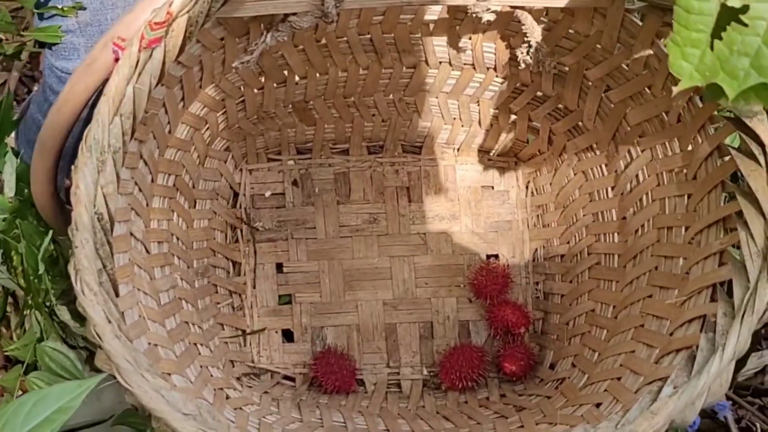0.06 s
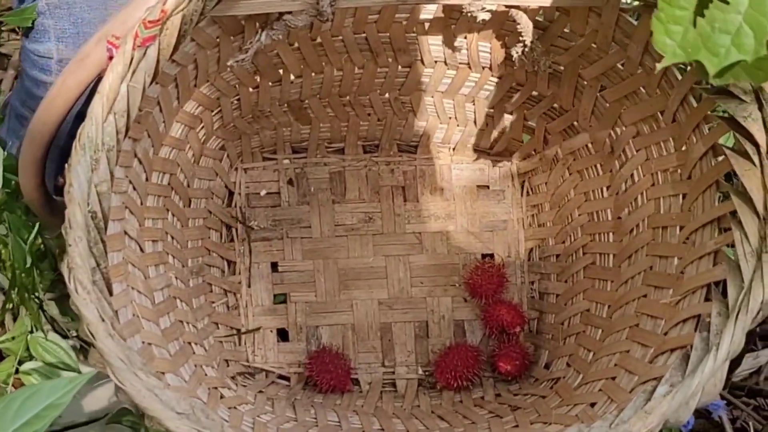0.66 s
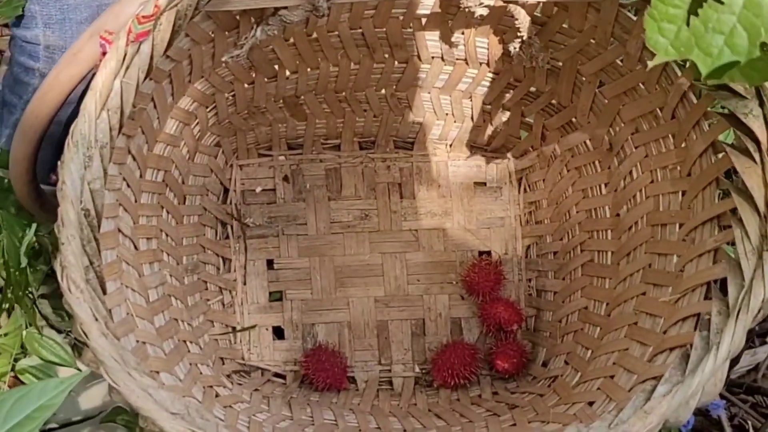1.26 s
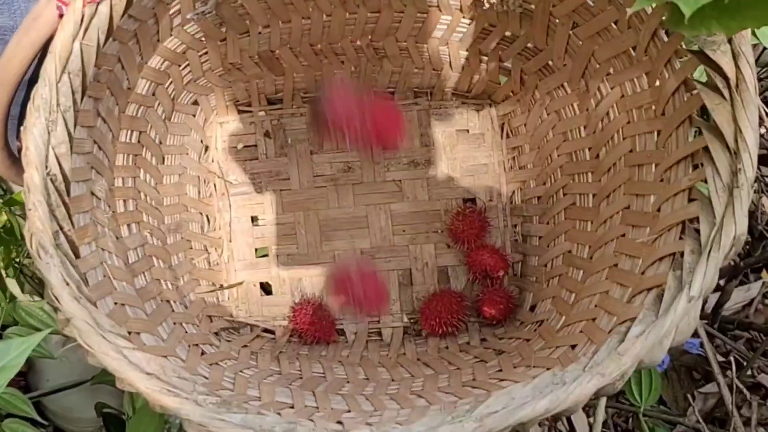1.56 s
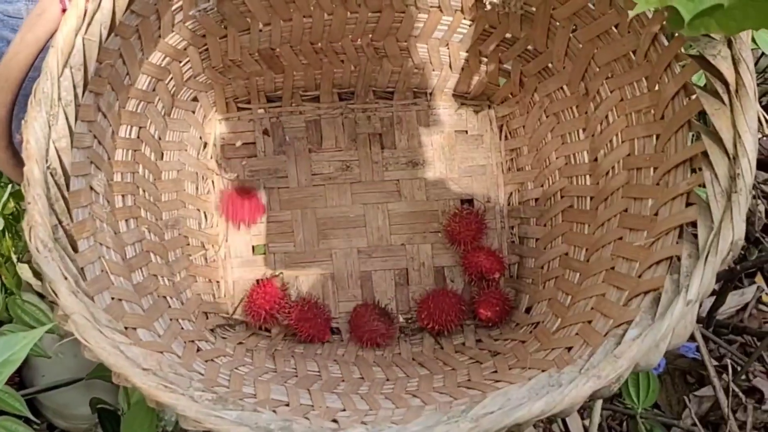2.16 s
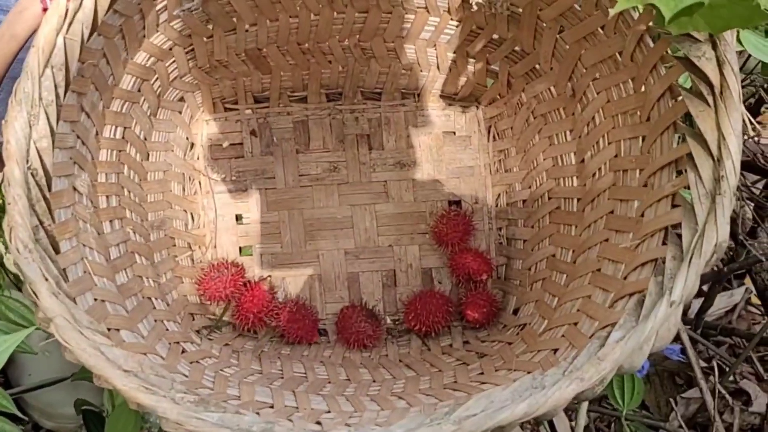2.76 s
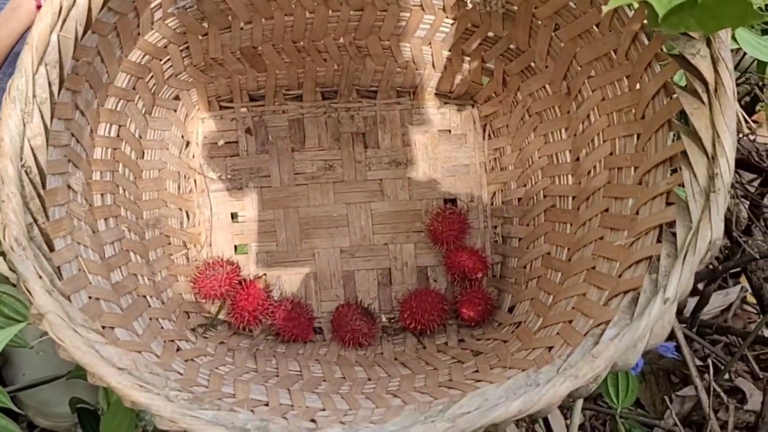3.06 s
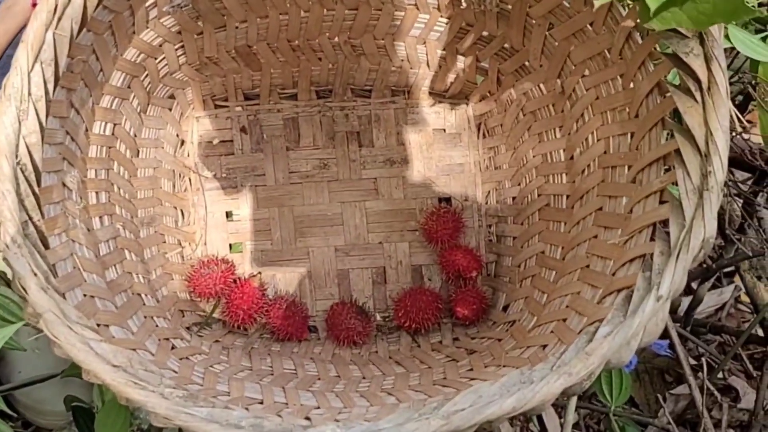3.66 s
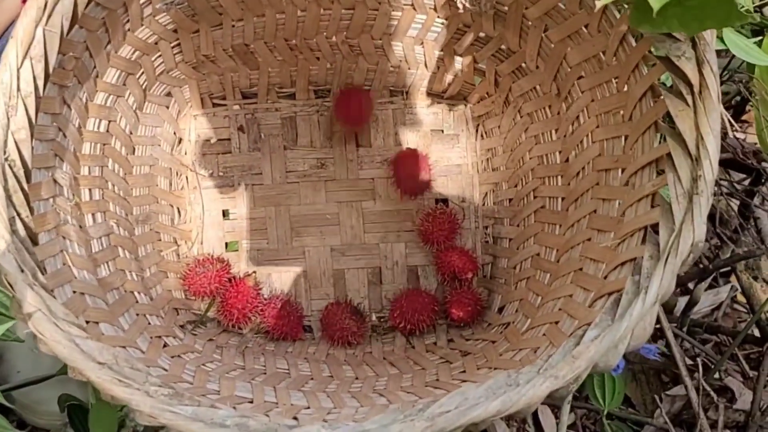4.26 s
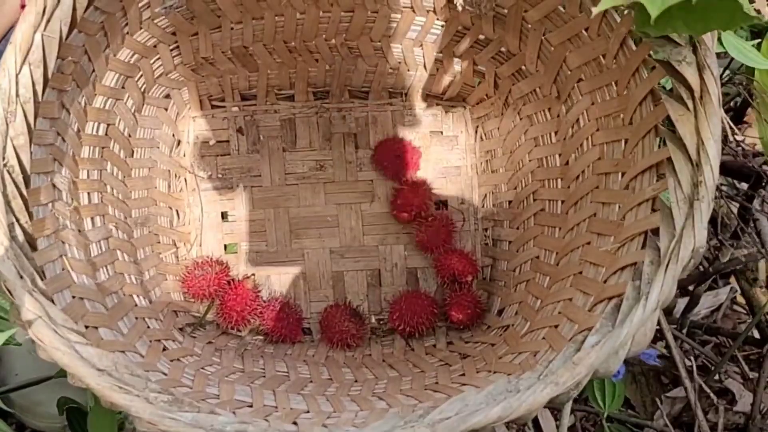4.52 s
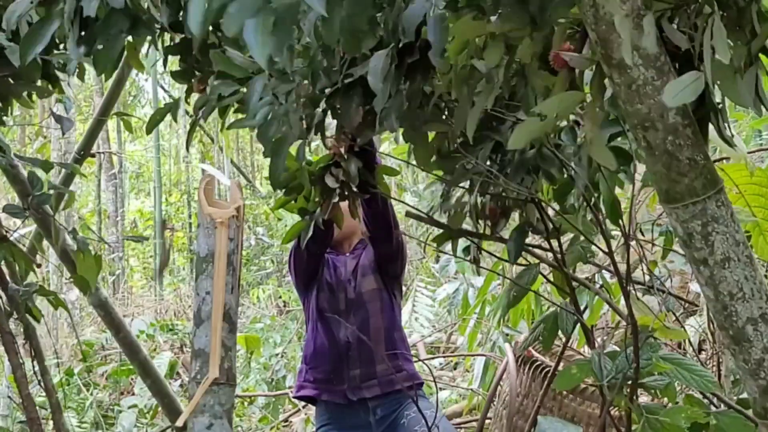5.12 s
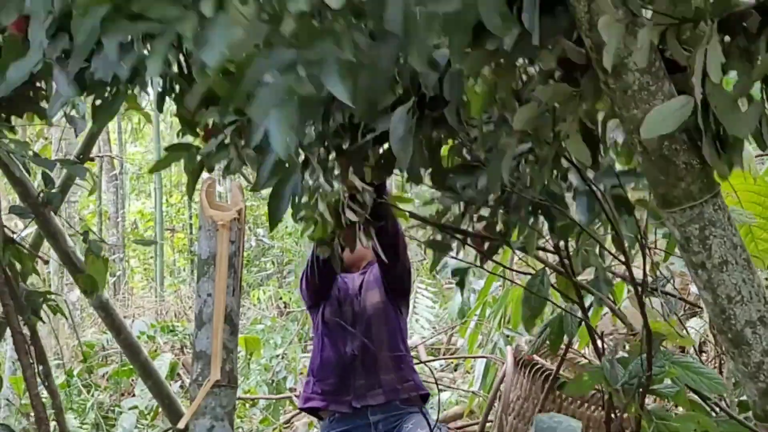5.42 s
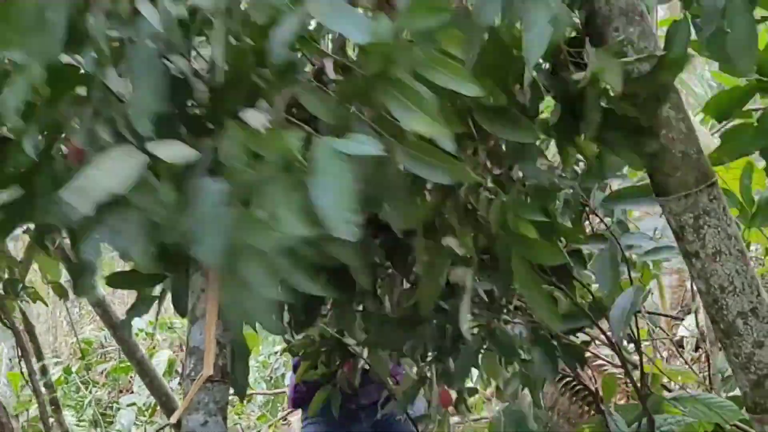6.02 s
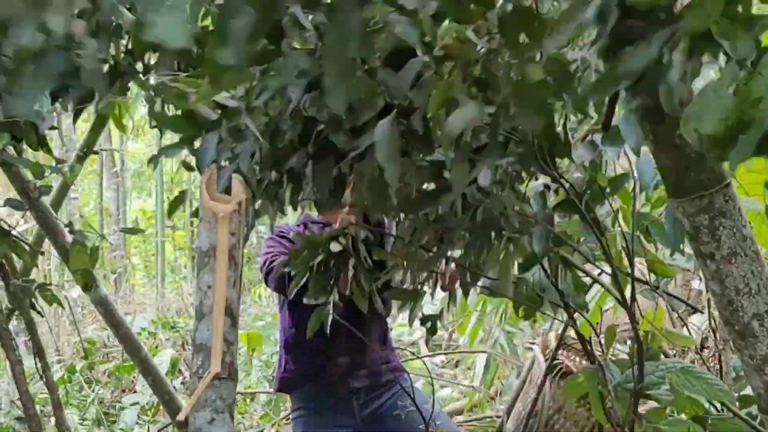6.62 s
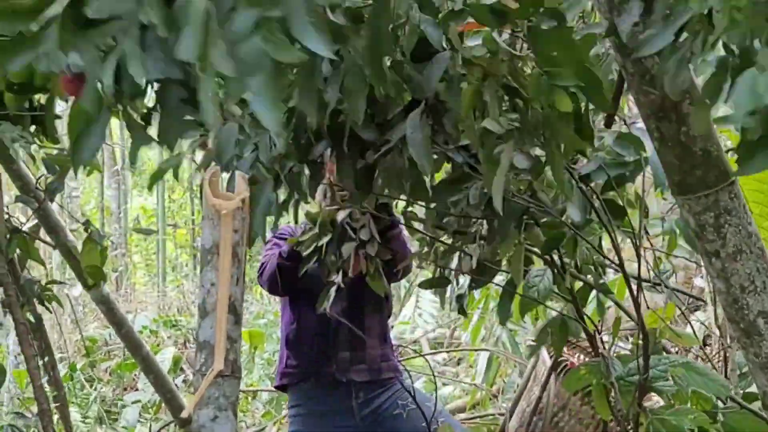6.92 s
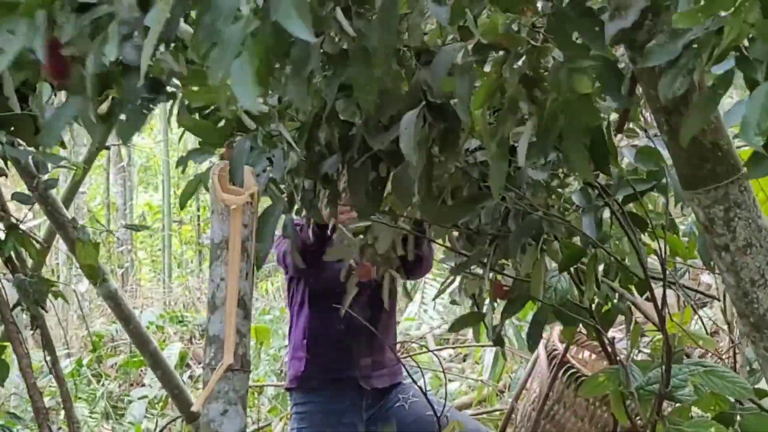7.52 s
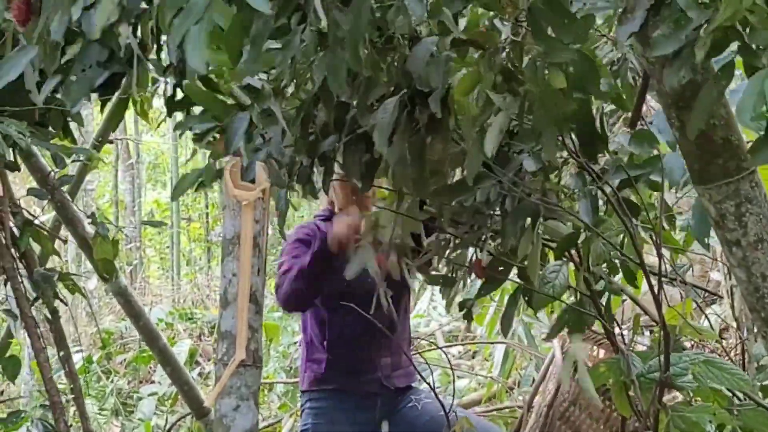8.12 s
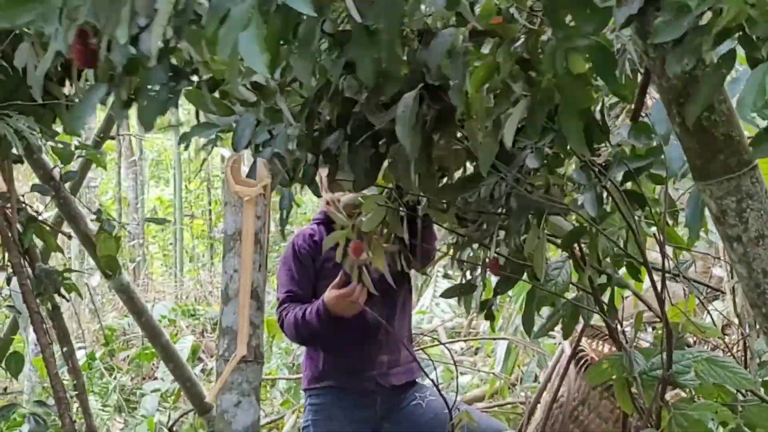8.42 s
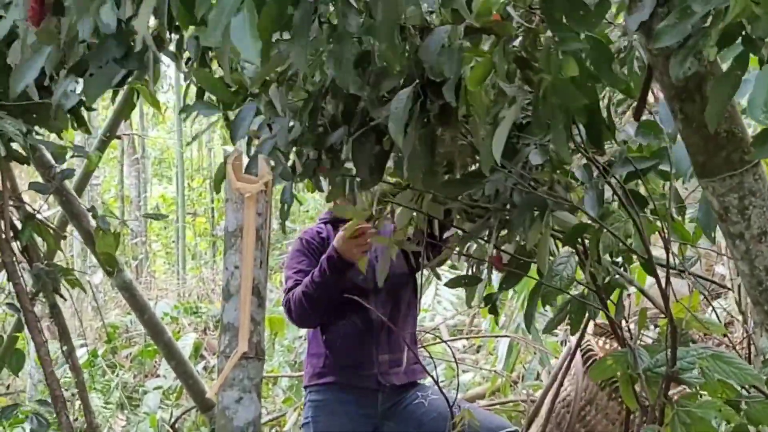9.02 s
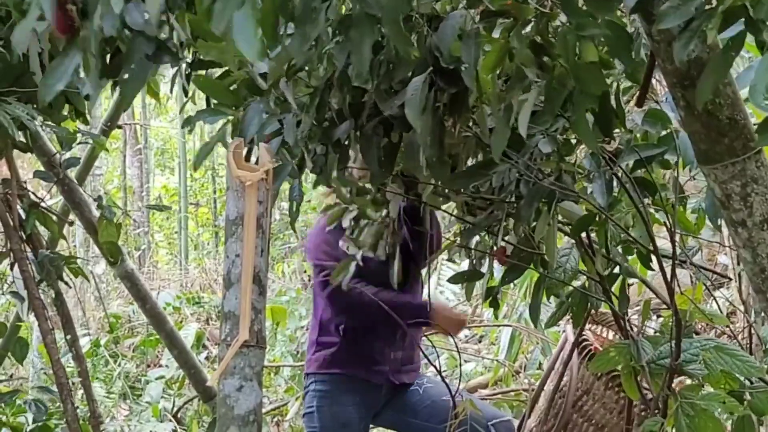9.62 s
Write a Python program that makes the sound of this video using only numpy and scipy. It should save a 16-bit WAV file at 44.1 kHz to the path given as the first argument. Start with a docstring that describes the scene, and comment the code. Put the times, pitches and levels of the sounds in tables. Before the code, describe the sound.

Soft leaf rustling and crisp stalk snaps surround two quick clusters of hollow thumps as fruits land in a woven basket near the microphone, with a faint, distant engine underneath. The sound cuts out for an instant and resumes a few metres from a tree in the wood. A tugged branch swishes, its leaves flap and gradually calm, and twigs keep breaking. Insects sing thinly and a far bird calls once near the end.

```python
"""In a wood, close to a woven basket: hands rustle through leaves, stalks snap, and spiny fruits drop
in, thump on the basket's floor and bounce. An engine hums far off. After a brief silence the scene is
heard from a few metres away: a bough is pulled down, its leaves swish and settle, and twigs are broken
off it. Insects sing and a far bird calls once."""
import sys
import numpy as np
from scipy import signal
from scipy.fft import rfft, irfft, next_fast_len
from scipy.io import wavfile
from scipy.ndimage import uniform_filter1d, map_coordinates

SR = 44100
rng = np.random.default_rng(int(sys.argv[2]) if len(sys.argv) > 2 else 0)


def to_wav(sig):
    """Store sig (one row per channel, or 1-D mono) as 16-bit WAV at the path in sys.argv[1].

    Samples outside -1..1 are clipped; the rate is SR.
    """
    pcm = np.clip(np.atleast_2d(sig), -1, 1) * 32767
    pcm = np.round(pcm).astype(np.int16)
    wavfile.write(sys.argv[1], SR, pcm.T)  # frames by channels


N = 435707


def amp(db):
    """Turn decibels (dB) into a number to multiply a sound by."""
    return 10 ** (np.asarray(db) / 20)


def unit(x):
    """Scale x to an average strength (rms) of 1."""
    return x / np.sqrt(np.mean(x ** 2) + 1e-20)


def along(points, hz):
    """Read between rows of frequency and value, giving each octave equal room."""
    frequencies, values = np.transpose(points)
    return np.interp(np.log(hz + 1), np.log(frequencies + 1), values)


def curves(rows):
    """Turn each column after the time into one value per sample."""
    times, *columns = np.transpose(rows)
    return [np.interp(np.arange(N) / SR, times, column) for column in columns]


def wobble(rate):
    """A smooth curve through `rate` random values a second."""
    return map_coordinates(rng.standard_normal(int(N * rate / SR) + 4), [np.arange(N) * rate / SR])


def panned(pan_db):
    """Left and right gains that make the left louder by pan_db."""
    return amp(np.array([[.5], [-.5]]) * pan_db)


def add(out, seconds, x):
    """Mix x into out, starting at the given time."""
    start = round(seconds * SR)
    out[:, start:start + x.shape[-1]] += x[..., :N - start]


def coloured(pair, spectrum):
    """Shape two unrelated signals into stereo of strength 1 with this spectrum, alike in the bass."""
    # How alike left and right are. Each row: frequency in Hz, likeness from 0 to 1.
    likeness = [(60, 0.72), (250, 0.92), (500, 0.72), (1000, 0.25), (2000, 0), (16000, 0.05)]
    size = pair.shape[1]
    padded = next_fast_len(size + 4096)
    hz = np.fft.rfftfreq(padded, 1 / SR)
    blend = np.arcsin(np.clip(along(likeness, hz), 0, 1)) / 2
    shaped = rfft(pair, padded) * amp(along(spectrum, hz))
    return unit(irfft(np.cos(blend) * shaped + np.sin(blend) * shaped[::-1], padded)[:, :size])


def noise(spectrum, size=N):
    """Smooth stereo noise of strength 1 with this spectrum."""
    return coloured(rng.standard_normal((2, size)), spectrum)


def strokes(rows, rise_ratio):
    """Hiss and body power of leaf strokes: each swells, then falls 10 dB over its fade time."""
    t, hiss, body = np.arange(N) / SR, np.zeros(N), np.zeros(N)
    for peak_s, db, fade_s, body_db in rows:
        from_peak = np.maximum(t - peak_s, (peak_s - t) / rise_ratio) / fade_s
        power = amp(db - 10 * np.minimum(from_peak, 10)) ** 2
        hiss += power
        body += power * amp(body_db) ** 2
    return hiss, body


def rustle(spectrum, per_second, spread_db, life_s, share):
    """Tiny, uneven leaf contacts carry `share` of the power; smoothly sliding leaves make the rest."""
    contacts = rng.random(N) < per_second / SR
    sizes = amp(spread_db * np.minimum(rng.exponential(size=N), 4))
    power = signal.lfilter([1], [1, -np.exp(-2 / (life_s * SR))], (contacts * sizes) ** 2)
    envelope = np.sqrt(1 - share + share * power / power.mean())
    slices = signal.stft(envelope * rng.standard_normal((2, N)), nperseg=256)[2]
    tint = uniform_filter1d(rng.standard_normal(slices.shape[1:]), 5, axis=0)
    tint_db = 2.2 * unit(uniform_filter1d(tint, 5, axis=1))  # each burst gets its own tone colour
    return coloured(signal.istft(slices * amp(tint_db), nperseg=256)[1][:, :N], spectrum)


def ticks(spectrum, per_second, spread_db, life_s):
    """Leaf edges and small stems touch now and then, making dry ticks."""
    contacts = (rng.random(N) < per_second / SR) * amp(spread_db * rng.random(N))
    envelope = signal.lfilter([1], [1, -np.exp(-1 / (life_s * SR))], contacts)
    return coloured(envelope * rng.standard_normal((2, N)), spectrum)


def hands_in_leaves(resting_hiss_db=-60.5, resting_body_db=-76):
    """Hands brush through the leaves by the basket, which keep stirring between strokes."""
    # Hand strokes. Each row: peak time in seconds, hiss in dB, fade in seconds, body in dB over hiss.
    brushes = [(.02, -53, 0.68, -11), (.26, -46.5, .2, -8.5), (.47, -55.5, 0.22, -46),
               (.68, -55.5, 0.39, -4.5), (.88, -57.5, 0.66, -22), (1.46, -56.5, .1, -6),
               (1.69, -52.5, 0.35, -8), (1.92, -61.5, 0.45, -7), (2.25, -48, 0.055, -12.5),
               (2.53, -51.5, 0.13, -11), (2.64, -47.5, 0.12, -9.5), (2.83, -58, 1, -8),
               (3.34, -40.5, 0.081, -9), (3.42, -48.5, 0.081, -9), (3.545, -49, 0.049, -3.5),
               (4.06, -51.5, 0.39, -6.5), (4.31, -49, 0.25, -11.5), (4.48, -49.5, 0.41, -7),
               (4.625, -38.5, 0.065, -9.5), (4.78, -51, 0.18, -11), (4.97, -55, 0.32, -9)]
    # The leaves' high hiss and their lower body. Each row: frequency in Hz, level in dB.
    hiss_spectrum = [(880, -41.5), (1500, -16), (1720, -5.5), (2210, -13.5), (2510, -3), (3840, -1),
                     (4640, 0), (5600, -3.5), (6760, -3), (14600, -5.5), (15500, -9.5), (16000, -25)]
    body_spectrum = [(110, -40.5), (180, -14), (285, -8.5), (407, -15), (639, -11.5), (1430, -15),
                     (1730, -15.5), (2200, -8), (2860, -28.5), (4840, -120)]
    hiss_power, body_power = strokes(brushes, rise_ratio=0.5)
    hiss = rustle(hiss_spectrum, per_second=300, spread_db=4.5, life_s=.002, share=.2)
    stray = amp(-11) * ticks(hiss_spectrum, per_second=20, spread_db=14, life_s=.0018)
    body = rustle(body_spectrum, per_second=150, spread_db=3.5, life_s=.006, share=.3)
    return (np.sqrt(hiss_power + amp(resting_hiss_db) ** 2) * (hiss + stray)
            + np.sqrt(body_power + amp(resting_body_db) ** 2) * body)


def air(level_db):
    """The open air makes a faint, steady rumble."""
    # The rumble. Each row: frequency in Hz, level in dB.
    rumble = [(12, -41), (20, -21), (54, 1.5), (178, -12.5), (260, -8.5), (586, -36), (769, -20),
              (888, -19), (1500, -17), (1950, -46.5), (3300, -120)]
    return amp(level_db) * noise(rumble)


def engine():
    """Only a far engine's low exhaust tones and narrow roar carry, fading in and out on the way."""
    # How the engine runs. Each row: time in seconds, firings per second, level in dB.
    running = [(0, 29, -80), (.7, 33.9, -77), (1.4, 36, -68), (2.1, 35.17, -64), (3.0, 35.3, -68),
               (3.6, 35, -65), (4.4, 35, -65.5), (5, 32.6, -86)]
    # Exhaust tones. Each row: multiple of the firing rate, level in dB.
    exhaust = [(2, -5), (3, -5.5), (4, -10), (8, -11), (9, -12)]
    # The roar. Each row: frequency in Hz, level in dB.
    roar = [(200, -35), (265, 1.5), (300, 0.5), (345, -7.5), (430, -17), (600, -31.5)]
    firing_hz, db = curves(running)
    phase = 2 * np.pi * np.cumsum(firing_hz * (1 + .007 * wobble(8))) / SR
    tones = sum(amp(level + wobble(9)) * np.sin(multiple * phase) for multiple, level in exhaust)
    return amp(db) * (tones + amp(-2) * noise(roar))


def snaps(rows, level_db, crack_db, rise_s, break_s, ping_s, strain_db, shake_db, shake_s, ragged_db):
    """A stem strains, breaks fibre by fibre and pings, and its leaves shake a little longer."""
    # The bright snap. Each row: multiple of the snap's pitch, level in dB.
    snap_shape = [(.1, -31), (.45, -9.5), (.8, -1.5), (1, 1.5), (1.2, -2), (2, -4.5), (4, -9.5)]
    # The low crack of thicker wood. Each row: frequency in Hz, level in dB.
    crack_spectrum = [(100, -32), (260, 1.5), (700, 1), (1500, -2), (2800, 4), (5000, -21), (10000, -36.5)]
    lead_s = .02  # room for the strain before the break
    out, t = np.zeros((2, N)), np.arange(SR // 4) / SR - lead_s
    after = np.maximum(t, 0)
    strain = amp(strain_db) * np.exp(-np.abs(t) / 0.003)
    onset = 1 - np.exp(-after / rise_s)
    shake = amp(shake_db - 60 * after / shake_s)  # shake_s, break_s and ping_s: time to fade by 60 dB
    for break_at, db, hz, low_db, pan_db in rows:
        fibres = unit(amp(ragged_db * unit(uniform_filter1d(rng.standard_normal(len(t)), size=30))))
        release = onset * (fibres * amp(-60 * after / break_s) + shake)
        snap = noise([(hz * ratio, level) for ratio, level in snap_shape], len(t))
        crack = amp(low_db + crack_db) * noise(crack_spectrum, len(t))
        ping = onset * amp(3 - 60 * after / ping_s) * np.sin(2 * np.pi * (hz * t + rng.random((2, 1))))
        sound = (strain + release) * (snap + crack) + ping
        add(out, break_at - lead_s, amp(db + level_db) * panned(pan_db) * sound)
    return out


def stalks():
    """Stalks and leaves near the basket strain, then snap raggedly."""
    # Each row: time in seconds, level in dB, pitch in Hz, low crack in dB, left over right in dB.
    breaks = [(.963, -37.5, 5970, -35, -2), (1.206, -42, 12500, -13.5, 1), (1.437, -42.5, 8500, -5.5, 0),
              (1.601, -29.5, 5050, -15, 3), (1.633, -27, 7200, -18, 12), (1.726, -38, 7910, -27, -.5),
              (1.885, -26.5, 7700, -26, 1.5), (2.247, -46, 4750, -22, -1), (2.724, -36.5, 4830, -17.5, 0.5),
              (3.294, -28, 3120, -23, 1.5), (3.336, -19.5, 4860, -12.5, 4), (3.704, -36.5, 4650, -24, -4),
              (3.771, -40.5, 3240, -45, -5), (4.259, -33.5, 9620, -33, 4), (4.602, -29, 8150, -17, 0.5),
              (4.630, -20.5, 7760, -16.5, 5), (4.676, -29.5, 13900, -40, 4.5),
              (4.807, -33.5, 11700, -10.5, 0.5), (4.924, -29, 4900, -27, -2)]
    return snaps(breaks, level_db=-2.5, crack_db=4, rise_s=0.000703, break_s=0.021, ping_s=0.0083,
                 strain_db=-9, shake_db=-22.5, shake_s=0.22, ragged_db=6.5)


def tree_echo(x):
    """Trunks and leaves scatter a sound back as a short echo."""
    # The echo's length. Each row: frequency in Hz, seconds to fade by 60 dB.
    fade_times = [(200, 0.28), (2000, 0.14), (6000, 0.28), (14000, 0.073)]
    hz, t, slices = signal.stft(rng.standard_normal((2, SR // 2)), SR, nperseg=256)
    tail = signal.istft(slices * amp(-60 * t / along(fade_times, hz)[:, None]), SR, nperseg=256)[1]
    return signal.fftconvolve(x, tail / np.linalg.norm(tail[0]), axes=1)[:, :N]


def fruit_in_basket(contact_s=0.0062, crunch_rise_s=0.0027, crunch_fade_s=0.06, wall_fade_s=0.28):
    """Soft spines crunch on the weave, then the fruit's weight rings the floor and shakes the walls."""
    # Fruit landings. Each row: start in seconds, thump in dB, floor pitch in Hz, crunch in dB,
    # seconds for the ring to fade by 60 dB.
    drops = [(1.56, -22.5, 200, -28, 0.047), (1.61, -19, 223, -28, 0.037),
             (1.633, -23.5, 250, -30.5, 0.037), (1.643, -17.5, 211, -27.5, 0.1),
             (1.685, -29.5, 203, -68, 0.071), (1.76, -42, 255, -42.5, 0.079), (1.863, -35, 220, -41, 0.13),
             (3.99, -24.5, 191, -29.5, 0.14), (4.029, -18.5, 204, -29, 0.0072),
             (4.075, -14.5, 183, -31, 0.065), (4.118, -16.5, 170.4, -33, 0.058),
             (4.327, -22.5, 202, -38.5, 0.077), (4.367, -23, 201, -45, 0.088)]
    # The floor's tones. Each row: multiple of its pitch, level in dB, multiple of its ring time.
    floor_tones = [(1, -1, 0.75), (1.09, -28, 3.3), (.7, -30.5, .6), (1.4, -23, 0.84), (2, -28, 0.28),
                   (3.3, -26.5, 1.3)]
    # The shivering walls and the crunching spines. Each row: frequency in Hz, level in dB.
    wall_spectrum = [(70, -20.5), (150, -7.5), (250, 4.5), (380, -25.5), (700, -12.5), (1500, -23.5),
                     (4000, -49)]
    spine_spectrum = [(100, 5.5), (400, 17.5), (700, 5.5), (1100, 3.5), (2200, -3.5), (4500, 5), (11000, 1),
                      (16000, 6)]
    out, t = np.zeros((2, N)), np.arange(SR // 3) / SR
    push = np.sin(np.pi / 2 * np.minimum(t / contact_s, 1)) ** 2  # the fruit squashes first
    after = np.maximum(t - contact_s, 0)
    crunch_shape = (1 - np.exp(-t / crunch_rise_s)) * amp(-60 * t / crunch_fade_s)
    for start, thump_db, hz, crunch_db, ring_s in drops:
        ring = sum(amp(level - 60 * after / (ring_s * stretch)) * np.sin(2 * np.pi * hz * ratio * t)
                   for ratio, level, stretch in floor_tones)
        walls = amp(-23 - 60 * t / wall_fade_s) * noise(wall_spectrum, len(t))
        add(out, start, amp(thump_db + 1) * push * (walls - ring))
        add(out, start, amp(crunch_db + 5) * crunch_shape * noise(spine_spectrum, len(t)))
    clock = np.arange(N) / SR
    out[0] = np.interp(clock - 0.000098, clock, out[0])  # the floor is a little farther from the left
    bass_cut = signal.butter(2, 100, "highpass", fs=SR, output="sos")
    return signal.sosfilt(bass_cut, out)  # the landings keep little deep bass below 100 Hz


def clacks(rise_s=0.00043, fade_s=0.01):
    """A fruit hits a stiff rib or another fruit, adding a short, hollow clack to the thump."""
    # Hard hits. Each row: start in seconds, level in dB.
    hits = [(1.612, -29.5), (1.646, -30.5), (4.119, -30)]
    # The hollow sound. Each row: frequency in Hz, level in dB.
    spectrum = [(200, -21), (550, -6.5), (900, -10), (1350, -9), (1750, -4), (2100, -15), (4000, -33)]
    out, t = np.zeros((2, N)), np.arange(SR // 10) / SR
    for start, db in hits:
        envelope = amp(db - 60 * t / fade_s) * (1 - np.exp(-t / rise_s))
        add(out, start, envelope * noise(spectrum, len(t))[0])
    return out


def bough(fastest_at_s=5.648, build_db_per_s=20, settle_db_per_s=7.5):
    """A tugged bough swings once and settles: its leaves brush each other and the broad ones flap."""
    # Tugs. Each row: peak time in seconds, hiss in dB, fade in seconds, flapping in dB over hiss.
    tugs = [(5.07, -40, 0.13, -8), (5.27, -38.5, 0.04, -11.5), (5.57, -34.5, 0.27, -12.5),
            (5.72, -34, 0.11, -11), (5.81, -33, 0.14, -12), (6.0, -35.5, 0.047, -16),
            (6.12, -35, 0.17, -16), (6.38, -50.5, .12, 2), (6.6, -41, 0.73, -11), (6.84, -42, 0.14, -10.5),
            (7.1, -43, 0.11, -14.5), (7.35, -43, 0.21, -7), (7.62, -41.5, 0.22, -12),
            (7.78, -44.5, 0.073, -12.5), (8.14, -44.5, 0.2, -12), (8.3, -45.5, 0.038, -7.5),
            (8.52, -56, 0.43, -10.5), (8.87, -55, 0.31, -16), (8.99, -50, 0.026, -20),
            (9.16, -45, 0.025, -22), (9.28, -59, 0.23, -13), (9.69, -52.5, 0.14, -12),
            (9.86, -55, 0.086, -10.5)]
    # The leaves' hiss and their flapping. Each row: frequency in Hz, level in dB.
    hiss_spectrum = [(880, -59), (1500, -14), (1780, -14), (2040, -10.5), (2370, -6.5), (3000, -1),
                     (4830, -0.5), (7690, 0), (9010, -4), (11800, -3), (14800, -6), (15500, -5),
                     (16000, -34)]
    flap_spectrum = [(53, -23), (90, -14.5), (183, -9.5), (269, -2), (347, -1), (485, -6), (687, -1.5),
                     (1240, -1.5), (1780, -1.5), (2030, 1.5), (2200, 0), (2860, -21), (4840, -120)]
    since = np.arange(N) / SR - fastest_at_s
    swing_db = np.minimum(build_db_per_s * since, -settle_db_per_s * since)
    hiss_power, flap_power = strokes(tugs, rise_ratio=0.75)
    hiss_power += amp(-35 + swing_db) ** 2
    flap_power += amp(-42.5 + 1.57 * swing_db) ** 2  # broad leaves flap only in a strong swing
    hiss = rustle(hiss_spectrum, per_second=800, spread_db=3.8, life_s=.0025, share=.16)
    flaps = rustle(flap_spectrum, per_second=220, spread_db=3.5, life_s=.006, share=.35)
    stray = amp(-15) * ticks(hiss_spectrum, per_second=16, spread_db=14, life_s=.003)
    return np.sqrt(hiss_power) * (hiss + stray) + np.sqrt(flap_power) * flaps


def insects():
    """Many distant insects blend into one high, nearly steady hiss."""
    # The chorus. Each row: frequency in Hz, level in dB.
    chorus = [(6000, -43), (7000, -19.5), (7650, -14.5), (8000, -18.5), (8500, -25), (11000, -50.5)]
    return amp(-61 + .6 * wobble(8)) * panned(pan_db=-5) * noise(chorus)


def twigs():
    """Twigs break off the bough and leave its leaves shaking."""
    # Each row: time in seconds, level in dB, pitch in Hz, low crack in dB, left over right in dB.
    breaks = [(5.1486, -28, 4800, -6.5, 0), (5.239, -24, 4350, -10, 1), (5.2887, -36, 3600, -25, -5),
              (5.4408, -34, 2920, -3, 3), (5.5658, -28, 5700, -27, -2), (6.104, -30, 7620, -10, 2),
              (6.33, -42, 4570, 1.5, 0.5), (6.3997, -39.5, 5070, 3.5, 0), (6.8586, -33, 5360, -23, -4),
              (7.2778, -29, 8700, -14, 1), (7.5996, -34, 4140, -22, -3), (7.6323, -34, 7260, -6, 1),
              (7.9036, -41, 13500, -18, -1), (8.1521, -33, 6200, -11.5, -2), (8.4107, -38, 7260, -35, -6.5),
              (8.5055, -43.5, 2700, -13, -0.5), (9.136, -33.5, 4870, -47, -3), (9.156, -46, 4030, -21, 5),
              (9.3985, -41.5, 4130, -23, 1), (9.5697, -38.5, 6800, -28, -1), (9.6576, -38.5, 5720, -23, -2)]
    return snaps(breaks, level_db=-4, crack_db=.5, rise_s=0.00065, break_s=0.029, ping_s=0.011,
                 strain_db=-24.5, shake_db=-6, shake_s=0.21, ragged_db=2)


def bird():
    """A bird deep in the wood gives one faint, rising hoot."""
    # The hoot. Each row: time in seconds, pitch in Hz, level in dB.
    hoot = [(9.51, 830, -100), (9.55, 880, -81), (9.62, 985, -68), (9.66, 1000, -100)]
    hz, db = curves(hoot)
    sounding = db > db.min()
    phase = 2 * np.pi * np.cumsum(hz * (1 + .01 * wobble(80))) / SR
    return sounding * amp(db) * np.sin(phase)


def scene(near_end_s=4.999, far_start_s=5.032):
    """First at the basket, then, after a moment of silence, facing the tree."""
    t = np.arange(N) / SR
    stalk_snaps, twig_snaps = stalks(), twigs()
    stalk_echo = amp(-17) * tree_echo(stalk_snaps)
    twig_echo = amp(-10) * tree_echo(twig_snaps)
    near = fruit_in_basket() + clacks() + stalk_snaps + stalk_echo
    near += hands_in_leaves() + engine() + air(level_db=-71)
    far = bough() + twig_snaps + twig_echo + insects() + bird() + air(level_db=-77)
    return near * (t < near_end_s) + far * (t > far_start_s)


def record(dry, top_hz=15600):
    """The microphone's two openings colour the treble differently; nothing above top_hz is kept."""
    # How the openings differ. Each row: frequency in Hz, left over right in dB.
    balance = [(700, -0.5), (1300, -1.5), (1850, -4.5), (2800, -1.5), (4000, -2.5), (5500, -2.5),
               (7200, -6), (8800, 1.5), (12000, 3), (15000, 2)]
    padded = next_fast_len(N + SR // 2)
    hz = np.fft.rfftfreq(padded, 1 / SR)
    response = panned(along(balance, hz)) * (hz < top_hz)
    return irfft(rfft(dry, padded) * response, padded)[:, :N]


dry = scene()
out = record(dry)
to_wav(out)
```